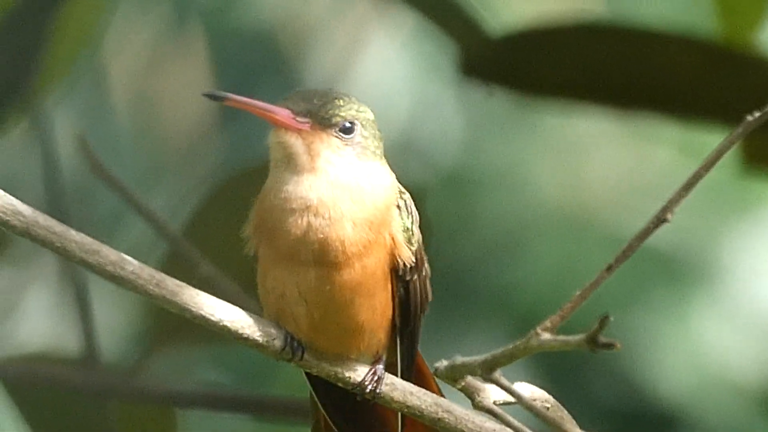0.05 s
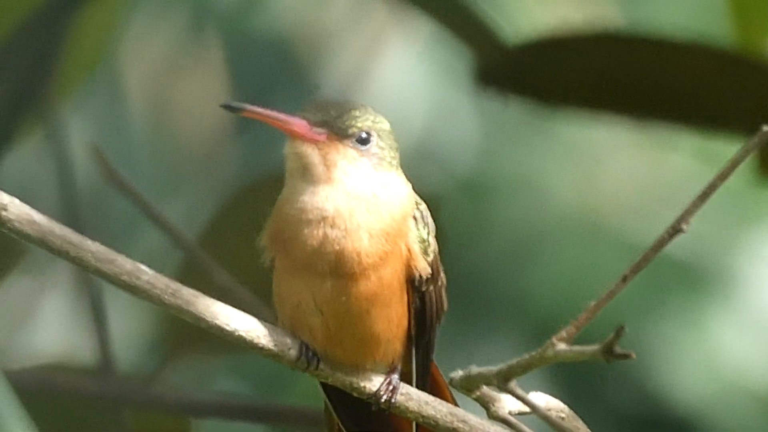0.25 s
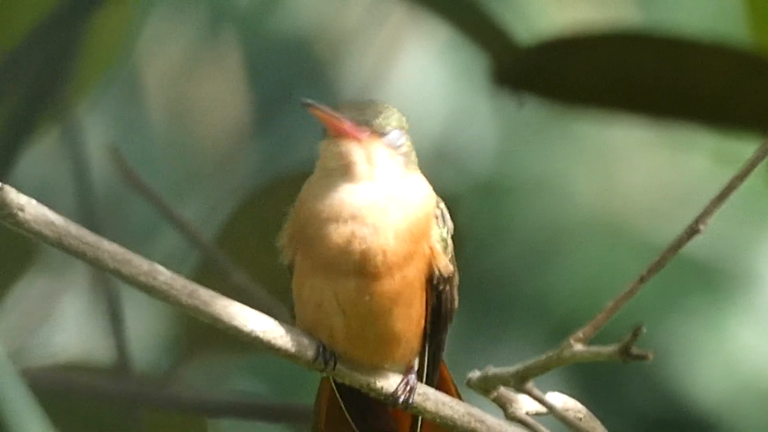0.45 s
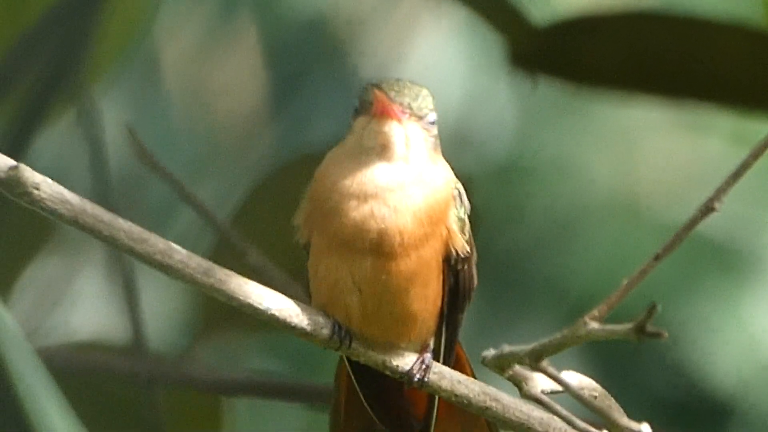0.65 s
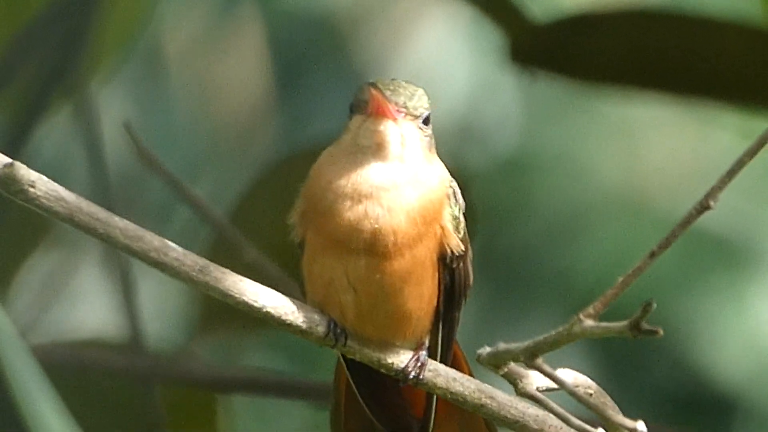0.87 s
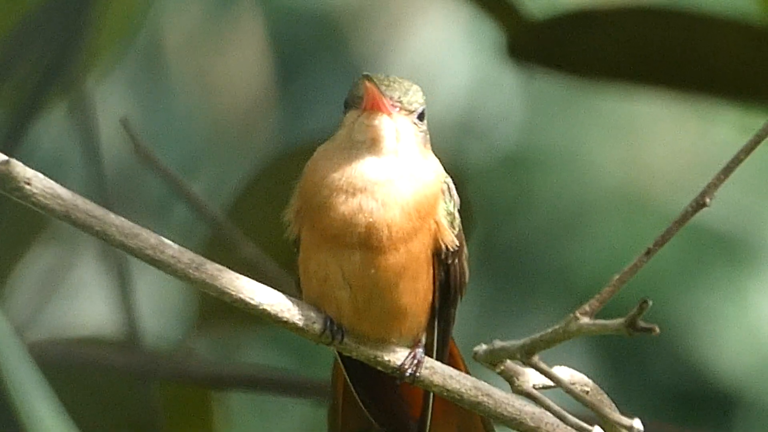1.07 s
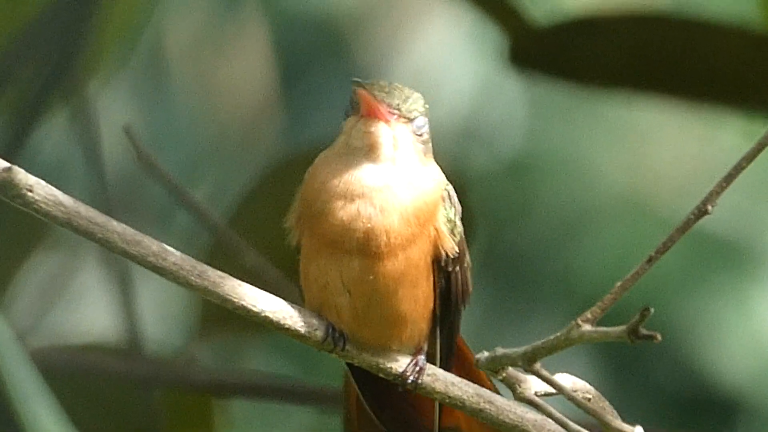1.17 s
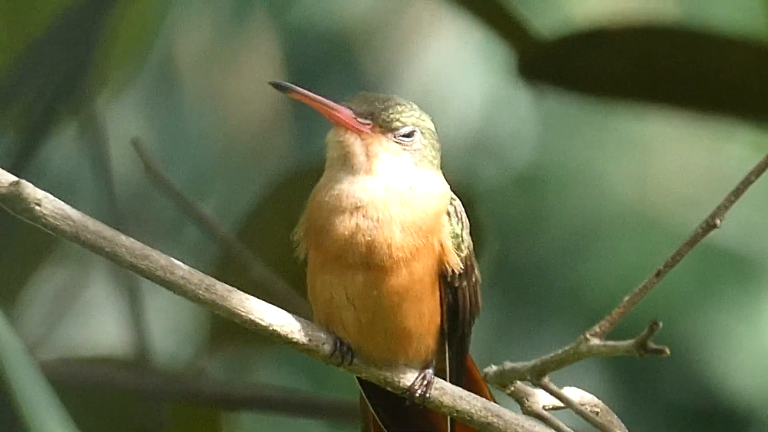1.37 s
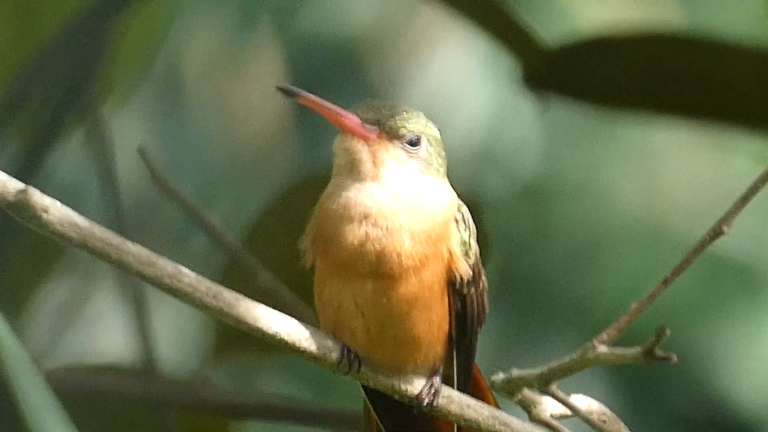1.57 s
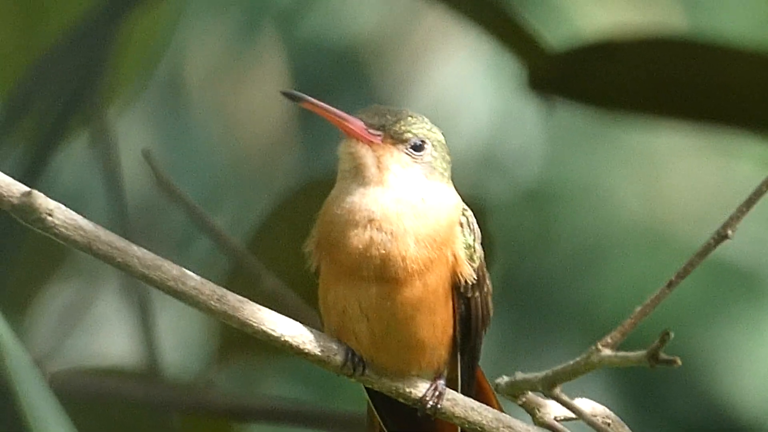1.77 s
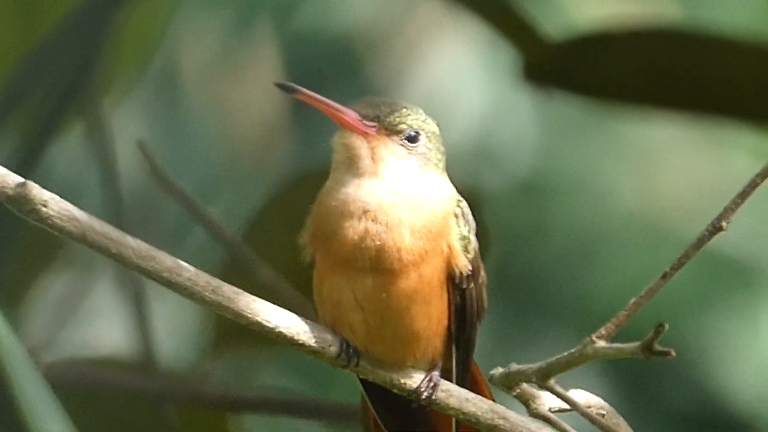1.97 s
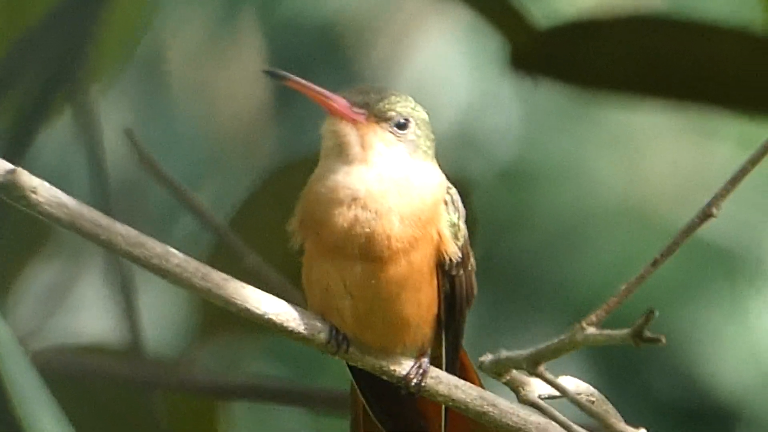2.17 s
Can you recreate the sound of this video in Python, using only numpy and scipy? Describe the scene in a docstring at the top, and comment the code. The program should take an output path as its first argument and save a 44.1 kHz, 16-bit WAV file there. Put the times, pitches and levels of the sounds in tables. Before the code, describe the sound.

Single brief hoarse bird squawk with a quick tree echo, over steady low forest noise

```python
"""A bird some way off in a forest gives one short rough squawk that rises, sags and turns hoarse; trees echo it.
Under it lie a steady low rumble and hiss, a mid band that swells twice near the end, and thin insect
bands near 7 kHz. The squawk is a stack of uneven partials plus breath, shaped by throat and beak, with a
second, higher side of the voice. The echo is a fading burst of noise; forest and insects are filtered noise."""
import sys
import numpy as np
from scipy import signal
from scipy.fft import rfft, irfft, next_fast_len
from scipy.io import wavfile
from scipy.ndimage import uniform_filter1d

SR = 44100
rng = np.random.default_rng(int(sys.argv[2]) if len(sys.argv) > 2 else 0)


def amplitude_ratio(level_db):
    """Convert a level in decibels to the matching linear amplitude (field) ratio."""
    exponent = np.asarray(level_db, float) / 20
    return 10 ** exponent


def waveform_to_disk(signal):
    """Save audio, clipped to [-1, 1], as 16-bit WAV at the path in sys.argv[1]."""
    frames = np.transpose(np.atleast_2d(signal))
    scaled = np.clip(frames, -1, 1) * 32767
    samples = np.round(scaled).astype(np.int16)
    wavfile.write(sys.argv[1], SR, samples)


N = 98078  # length in samples
LEFT_RIGHT = np.array([[1], [-1]])  # sign of the side signal in the left and right channel


def curve(table, col):
    """A table column as a value per sample."""
    a = np.array(table, float)
    return np.interp(np.arange(N) / SR, a[:, 0], a[:, col])


def at_hz(table, hz):
    """Read a (Hz, value) table on a log axis."""
    a = np.array(table, float)
    return np.interp(np.log(np.maximum(hz, 1)), np.log(a[:, 0]), a[:, 1])


def unit(x):
    """Scale to rms 1."""
    return x / np.sqrt(np.mean(x ** 2))


def colour(x, gain):
    """Weight the spectrum by gain(Hz)."""
    m = next_fast_len(N)
    hz = np.arange(m // 2 + 1) * SR / m
    return irfft(rfft(x, m) * gain(hz), m)[..., :N]


def walk(rate):
    """Random levels held for 1 / rate seconds and smoothed twice; spread near 1."""
    k = max(int(SR / rate), 1)
    steps = np.repeat(rng.standard_normal(N // 8)[:N // k + 1], k)
    return 1.3 * uniform_filter1d(uniform_filter1d(steps, k), k)[:N]


def forest():
    """Overlapping noise bands half an octave apart, each wavering a little; rumble, mid and hiss drift in level."""
    # relative loudness of the background along the spectrum [f/Hz, level/dB per Hz]
    spectrum = [(18, -79), (30, -33), (48, -35), (67, -17), (168, -2), (230, -2.5), (262, 0.5), (299, -1),
                (323, 0.5), (398, -6.5), (559, -9), (708, -7.5), (1020, -15), (3670, -29), (4760, -34.5),
                (7050, -32.5), (7820, -40.5), (10200, -39), (15400, -49)]
    # broad humps of the rumble [f/Hz, width/Hz, boost/dB]
    humps = [(85, 7.7, 5), (128, 18.5, 4.5), (197, 33, 4.5), (277, 10, 4), (321, 6.7, 1)]
    # stereo spread: side minus mid [f/Hz, level/dB]
    spread = [(60, -18), (110, -3), (200, -12.5), (380, -3), (700, -3.5), (1290, -1.5), (2380, -3.5),
              (4390, -6), (8110, -6), (15000, -1)]
    # balance: left minus right [f/Hz, level/dB]
    balance = [(60, -0.29), (200, -1.6), (600, -0.46), (2000, 1), (12000, -0.34)]
    # course of the low rumble; only its departure from the mean counts [t/s, level/dB]
    rumble_level = [(0.0, -45.5), (0.07, -52.5), (0.17, -48.5), (0.72, -50.5), (0.73, -50), (2.0, -51),
                    (2.22, -56)]
    # level change of the band around 620 Hz [t/s, change/dB]
    mid_swell = [(0, 1.5), (.5, 3), (.9, 3), (1.3, 0.5), (1.64, -1), (1.72, 5), (1.85, 6), (1.93, -2),
                 (2.05, 0.5), (2.2, 7.5)]
    # level change of the hiss above 2 kHz [t/s, change/dB]
    hiss_drift = [(0, 2), (.6, 2.5), (1.4, 2), (2.2, 0.5)]
    swell_hz, swell_octaves = 620, 0.74
    level_db = -42  # rms of the whole background

    rumble = curve(rumble_level, 1) - np.mean(curve(rumble_level, 1))
    out = 0
    for hz in 22 * 2 ** np.arange(0, 10, .5):
        def share(f):
            octaves = np.clip(np.log2(np.maximum(f, 1) / hz), -.5, .5)
            boost = sum(db * np.exp(-((f - c) / w) ** 2) for c, w, db in humps)
            return np.cos(np.pi * octaves) * amplitude_ratio(at_hz(spectrum, f) + boost)

        mid, side = colour(rng.standard_normal((2, N)), share)
        db = rumble / (1 + (hz / 500) ** 2)
        db = db + curve(mid_swell, 1) * np.exp(-(np.log2(hz / swell_hz) / swell_octaves) ** 2)
        db = db + curve(hiss_drift, 1) / (1 + (2000 / hz) ** 4)
        db = db + 0.6 * walk(6.03) + LEFT_RIGHT * at_hz(balance, hz) / 2
        out = out + amplitude_ratio(db) * (mid + LEFT_RIGHT * amplitude_ratio(at_hz(spread, hz)) * side)
    return amplitude_ratio(level_db) * unit(out)


def insects():
    """Distant insects as narrow bands of noise that throb unevenly."""
    # insect bands [f/Hz, width/Hz, level/dB, throb/dB]
    bands = [(6450, 200, -74, 1.5), (6973, 104, -70, 0), (7300, 37, -73, -3)]
    side_db = -12  # against the mid signal
    out = 0
    for hz, width, db, throb_db in bands:
        noise = rng.standard_normal((2, N))
        mid, side = unit(colour(noise, lambda f: np.exp(-((f - hz) / width) ** 4)))
        throb = throb_db * walk(60) + 1.5 * walk(4)  # fast and slow, dB
        out = out + amplitude_ratio(db + throb) * (mid + amplitude_ratio(side_db) * side * LEFT_RIGHT)
    return out


def tree_echo(bird):
    """Many trees return the sound at scattered moments: a dense, dying burst of noise spreads it out."""
    t60_s, gap_s = .31, .004  # time to fall by 60 dB; silence before the first echo
    level_db, side_db = -2, -6.5
    t = np.arange(SR // 2) / SR
    mid, side = rng.standard_normal((2, len(t))) * amplitude_ratio(-60 * t / t60_s) * (t > gap_s)
    scatter = (mid + amplitude_ratio(side_db) * side * LEFT_RIGHT) / np.sqrt(np.sum(mid ** 2))
    return amplitude_ratio(level_db) * signal.fftconvolve(bird[None], scatter, axes=1)[:, :N]


def sounding(table):
    """1 between the first and last time of a table, else 0, with softened edges."""
    t = np.arange(N) / SR
    return uniform_filter1d(1. * ((t > table[0][0]) & (t < table[-1][0])), size=300)


def flutter():
    """Small fast level changes of the voice in dB."""
    return 1 * walk(150)


def upper_voice():
    """The second, higher side of the voice: three partials on an unsteady pitch of their own."""
    # pitch and level, before its partials are weighted [t/s, pitch/Hz, level/dB]
    upper = [(.145, 2150, -57), (.165, 2330, -37.5), (.19, 2400, -39), (.215, 2380, -45.5),
             (.26, 2296, -77.5), (.29, 2376, -35), (.345, 2345, -71), (.365, 2540, -64)]
    # its partials [multiple of that pitch, level/dB]
    partials = [(.5, -12), (1, 2.5), (1.5, -13)]
    wobble = 0.0122  # as a fraction of the pitch
    turns = np.cumsum(curve(upper, 1) * (1 + wobble * walk(202.1))) / SR
    tone = sum(amplitude_ratio(db) * np.sin(2 * np.pi * k * turns) for k, db in partials)
    return np.sqrt(2) * sounding(upper) * amplitude_ratio(curve(upper, 2) + flutter()) * tone


def membrane():
    """Membrane pulses with uneven cycles and strong-weak pairs, plus breath that pulses with them."""
    # loudness before throat and beak; breath against the pulses [t/s, level/dB, breath noise/dB]
    loudness = [(.098, -52.5, -23), (.11, -43, -9), (.13, -35, 4), (.155, -37.5, 7), (.185, -34, 13),
                (.21, -28.5, 1), (.232, -31.5, 5), (.245, -28, 3), (.265, -38.5, 10.5), (.285, -32, 6),
                (.305, -36.5, 18), (.335, -42.5, 19.5), (.355, -46.5, 14), (.38, -55, 6)]
    # pitch [t/s, pitch/Hz]
    pitch = [(.095, 790), (.114, 810), (.121, 915), (.136, 935), (.146, 1000), (.155, 1050), (.18, 1085),
             (.205, 1095), (.235, 1082), (.25, 1050), (.275, 1050), (.3, 1070), (.325, 1020), (.365, 960)]
    # hoarseness [t/s, cycle scatter/0-1, strong-weak alternation/0-1, dullness/dB per partial above the second]
    hoarse = [(.095, .006, .05, -12), (.12, .006, .05, -7), (.14, .018, .1, -7), (.16, .035, .1, -3),
              (.19, .025, .05, 0), (.21, .01, .03, 0), (.24, .008, .15, 0), (.26, .006, .7, 0),
              (.3, .009, 1, 0), (.325, .02, 1, -2), (.355, .07, .6, -2)]
    # each partial flickers and slips on its own, the higher ones more
    flicker_db, slip_rad, slip_per_s = 1.1, .17, 160
    sink_db = -12  # partials above the third sink into the breath
    breath_hz = 3480  # the breath thins out below this

    scatter = curve(hoarse, 1) * (walk(1000) + walk(150))
    turns = np.cumsum(curve(pitch, 1) * (1 + scatter)) / SR
    pulses = 0
    for k in range(1, 15):
        db = flicker_db * min(k + 2, 5) * walk(slip_per_s)
        db = db + max(k - 2, 0) * curve(hoarse, 3) + sink_db * (k > 3)
        slip = slip_rad * k ** 1.9 * walk(slip_per_s)
        pulses = pulses + amplitude_ratio(db) * np.cos(2 * np.pi * k * turns + k + slip)
    pairs = 1 + curve(hoarse, 2) * np.cos(np.pi * turns)  # every other cycle is weaker
    noise = colour(rng.standard_normal(N), lambda hz: hz / np.hypot(hz, breath_hz))
    breath = amplitude_ratio(curve(loudness, 2)) * noise * (1 + 1.01 * np.cos(2 * np.pi * turns))
    level = sounding(loudness) * amplitude_ratio(curve(loudness, 1) + flutter())
    return np.sqrt(2) * level * (pulses * pairs + breath)


def throat_and_beak(source):
    """Throat and beak strengthen some pitches and weaken others; the treble also changes over time."""
    # colour of throat and beak [f/Hz, gain/dB]
    throat = [(400, -57), (700, -12.5), (1050, -14), (1300, -13.5), (1550, -9.5), (1800, -12.5),
              (2150, -0.5), (2500, -11), (2850, -10), (3250, -9), (3650, -18), (4200, -17), (4900, -27),
              (5600, -17.5), (6600, -21.5), (8000, -39), (8700, -30), (10000, -51), (15000, -48)]
    # level change of the treble above 4.8 kHz [t/s, change/dB]
    treble = [(.12, -1), (.16, 3), (.2, -6.5), (.24, -0.5), (.27, 11.5), (.3, 3), (.33, 4), (.36, -2)]
    low = colour(source, lambda hz: amplitude_ratio(at_hz(throat, hz)) * (hz < 4800))
    moving = source * amplitude_ratio(curve(treble, 1))
    high = colour(moving, lambda hz: amplitude_ratio(at_hz(throat, hz)) * (hz >= 4800))
    return low + high


def squawk():
    """The rough main voice through throat and beak, joined by the higher side of the voice."""
    return throat_and_beak(membrane()) + upper_voice()


def scene():
    """The bird in the middle, its echo off the trees, the forest and the insects."""
    bird = squawk()
    return bird + tree_echo(bird) + forest() + insects()


def roll_off(x):
    """The treble ends steeply here."""
    return signal.sosfilt(signal.butter(12, 15580, fs=SR, output="sos"), x)


def record(dry):
    """Turn the finished mix into the sound that is written out."""
    return roll_off(dry)


dry = scene()
out = record(dry)
waveform_to_disk(out)
```